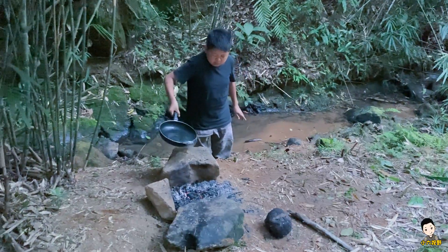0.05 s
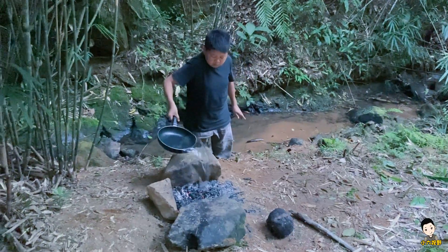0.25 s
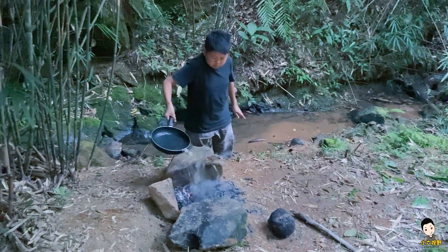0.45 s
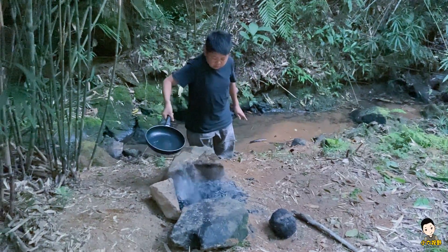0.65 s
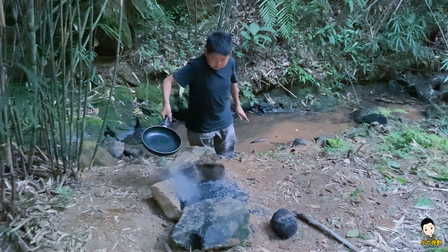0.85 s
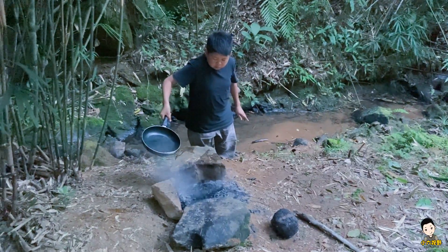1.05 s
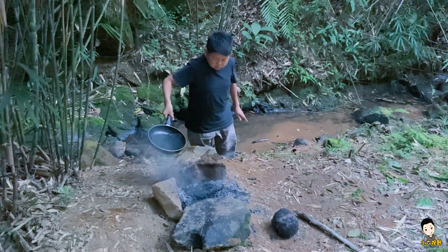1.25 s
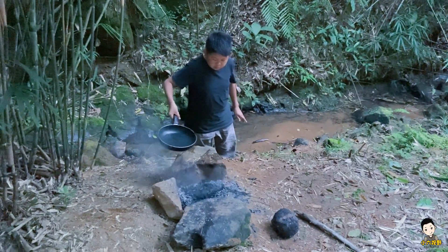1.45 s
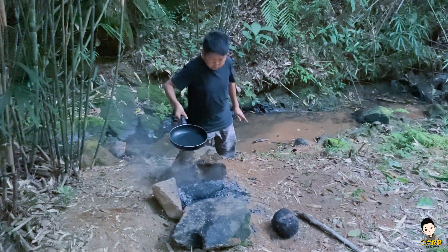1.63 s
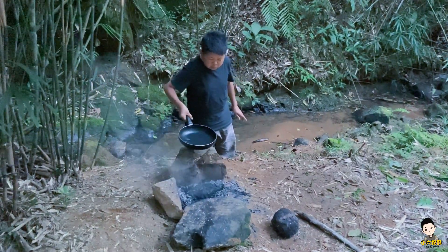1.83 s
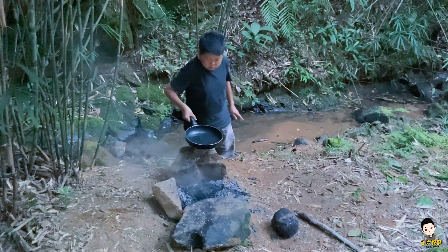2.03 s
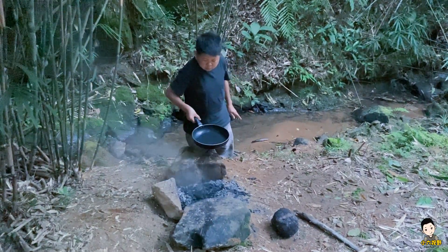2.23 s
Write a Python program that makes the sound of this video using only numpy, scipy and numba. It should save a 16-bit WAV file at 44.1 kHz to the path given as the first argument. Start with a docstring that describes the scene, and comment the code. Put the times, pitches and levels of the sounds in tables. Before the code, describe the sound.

Water hits hot charcoal with a spluttering steam hiss that fades, while cicadas drone by a stream

```python
"""Throughout, a stream murmurs behind cicadas whose clicks ring body resonances near 3.7 kHz.
At 0.3 s water tipped from a pan hits glowing charcoal: random grains, filtered and flickering, make low steam
puffs, splutter and a wide sizzle that slowly dies; a few lumps crack as short decaying tones.
One cicada slides up in a rising call at 0.72 s and again at 1.82 s.
A phone a few metres away hears it all, and its stereo processing turns left against right."""
import sys
import numpy as np
from scipy import signal
from scipy.fft import rfft, irfft, next_fast_len
from scipy.io import wavfile
from scipy.ndimage import uniform_filter1d
from numba import njit

SR = 44100
rng = np.random.default_rng(int(sys.argv[2]) if len(sys.argv) > 2 else 0)


def undo_db(level):
    """Turn decibels back into plain size, where 20 dB means ten times bigger."""
    steps = np.asarray(level, float) / 20
    return 10 ** steps


def transcribe(signal):
    """Save signal, clipped to [-1, 1], as a 16-bit WAV file at the path in sys.argv[1]."""
    frames = np.atleast_2d(signal).T
    limited = np.clip(frames, -1, 1)
    pcm = np.round(limited * 32767).astype(np.int16)
    wavfile.write(sys.argv[1], SR, pcm)


N = 100856
T = np.arange(N) / SR  # s
FFT_SIZE = next_fast_len(N, True)
HZ = np.fft.rfftfreq(FFT_SIZE, 1 / SR)


def column(table, at, order, warp=np.asarray):
    """One column of a table, joined by straight lines."""
    table = np.array(table, float)
    return np.interp(warp(at), warp(table[:, 0]), table[:, order])


def unit(x):
    """Scale to rms 1."""
    return x / np.sqrt(np.mean(x ** 2))


def walk(rate):
    """Random levels held 1 / rate s and smoothed twice; spread near 1."""
    hold = int(SR / rate)
    held = np.repeat(rng.standard_normal(N // hold + 1), hold)
    smooth = uniform_filter1d(uniform_filter1d(held, hold), hold)
    return 1.2 * smooth[:N]


def grains(rate, scatter_db):
    """Clicks at random moments, rate per second, with a long-tailed spread of sizes; rms 1."""
    hit = rng.random(N) < rate / SR
    signed_height = rng.standard_normal(N)
    size = rng.exponential(size=N)
    return unit(hit * signed_height * undo_db(scatter_db * size))


def colour(x, shape):
    """Filter by (Hz, dB) points joined on a log-frequency axis; rms 1."""
    gain = undo_db(column(shape, HZ + 1, order=1, warp=np.log))
    return unit(irfft(rfft(x, FFT_SIZE) * gain, FFT_SIZE)[:N])


def flicker(x, shared_db, own_db, rate):
    """Half-octave bands swell together and flutter alone, twice as fast; rms 1."""
    spectrum = rfft(x, FFT_SIZE)
    shared = walk(rate)
    out = 0
    for k in range(22):
        # overlapping triangular bands, from 16 Hz up
        share = np.clip(1 - abs(2 * np.log2((HZ + 1) / 16) - k), 0, 1)
        band = irfft(spectrum * share, FFT_SIZE)[:N]
        out = out + band * undo_db(shared_db * shared + own_db * walk(2 * rate))
    return unit(out)


@njit
def svf(x, hz, width, sr):
    """State-variable band-pass with a moving centre."""
    y, band, low = np.empty(len(x)), 0., 0.
    for i in range(len(x)):
        g, damping = np.tan(np.pi * hz[i] / sr), width / hz[i]
        v = (band + g * (x[i] - low)) / (1 + g * (g + damping))
        band, low, y[i] = 2 * v - band, low + 2 * g * v, damping * v
    return y


def ring(x, hz, width_hz):
    """A steep resonance: the band-pass twice, each pass width_hz wide; rms 1."""
    once = svf(x, hz, 1. * width_hz, 1. * SR)
    return unit(svf(once, hz, 1. * width_hz, 1. * SR))


def stereo_processing(direct, scattered, likeness=1.):
    """The recorder turns the phase between left and right, by frequency; the scattered part adds in opposition."""
    # recorder's stereo process: f/Hz, phase by which the right leads/rad, likeness (0-1), left over right level/dB
    stereo_table = [(170, -.1, .96, 1), (520, -.3, .94, 1.5), (690, -.5, .65, 4), (1050, -.5, .92, 3),
                    (1600, -1.3, .7, 3), (2050, -.6, .35, 1), (2700, -1.5, .65, .4), (3300, -.4, .3, -.4),
                    (3800, -.3, .55, -1), (4350, -.2, .45, -.8), (4900, -2.4, .4, 1.5),
                    (5500, -4.1, .3, 1.5), (6400, -6.2, .8, .4), (7000, -6.3, .95, .1),
                    (9150, -3.14, .996, 0), (15400, 6.3, .996, 0)]
    lead, alike, tilt_db = (column(stereo_table, HZ, order=k) for k in (1, 2, 3))
    # the likeness argument acts on the part below 8400 Hz only
    alike = np.clip(alike * np.where(HZ < 8400, likeness, 1), 0, 1)
    common = rfft(direct, FFT_SIZE) * np.sqrt((1 + alike) / 2)
    opposed = rfft(scattered, FFT_SIZE) * np.sqrt((1 - alike) / 2)
    channels = []
    for side in (1, -1):  # left, right
        turn = np.exp(-.5j * side * lead) * undo_db(side * tilt_db / 2)
        channels.append(irfft((common + side * opposed) * turn, FFT_SIZE)[:N])
    return np.array(channels)


def stream():
    """Distant running water: filtered noise, nearly smooth."""
    # tone of the water: f/Hz, relative level/dB
    water_tone = [(25, -27), (55, 3), (170, -7), (350, 2.5), (520, -1.5), (640, -11.5), (1200, -9),
                  (1700, -7), (2500, -4), (5500, 0), (7000, -3.5), (9900, -5.5), (11500, -6.5), (15500, 1)]
    water = colour(rng.standard_normal(N), water_tone)
    return undo_db(-54.5) * flicker(water, shared_db=0.37, own_db=1.9, rate=5.076)


def cicadas():
    """Dense tymbal clicks ring the insects' resonances; the chorus throbs and the caller slides up."""
    # chorus: t/s, level/dB, centre f/Hz
    chorus = [(0, -40, 3690), (.3, -42.5, 3726), (.38, -47, 3720), (.6, -46, 3657), (.8, -47, 3633),
              (.95, -41.5, 3730), (1.12, -44, 3720), (1.2, -42.5, 3770), (1.38, -44.5, 3740),
              (1.48, -42, 3766), (1.6, -46.5, 3790), (1.75, -50, 3745), (1.95, -50.5, 3680),
              (2.14, -46, 3644), (2.29, -42, 3698)]
    # tymbal and belly resonances: offset from centre f/Hz, width of each filter pass/Hz, relative level/dB
    resonances = [(-190, 196, 0), (-47, 120, -3), (107.5, 71, -0.5), (187, 260, -3), (-120, 490, -2),
                  (432, 360, -4.5), (785, 260, -9), (-480, 350, -12.5), (-1750, 79, -28.5)]
    # rising calls: start t/s, swell t/s, fade t/s, level/dB
    rising_calls = [(.72, 0.068, 0.31, -49.5), (1.82, 0.29, 0.28, -45)]
    clicks_per_s, click_scatter_db = 4000, 1.04
    throb_db, throb_per_s = 0.73, 10.95
    call_start_hz, call_rise_hz_per_s, call_width_hz = 3115, 1100, 355

    centre_hz = column(chorus, T, order=2)
    song = 0
    for offset_hz, width_hz, db in resonances:
        throb = undo_db(db + throb_db * walk(throb_per_s))
        song = song + throb * ring(grains(clicks_per_s, click_scatter_db), centre_hz + offset_hz, width_hz)
    song = unit(song) * undo_db(column(chorus, T, order=1))

    for start, swell, fade, db in rising_calls:
        age = np.clip(T - start, 0, 1)
        envelope = np.clip(np.minimum(age / swell, 1 - (age - swell) / fade), 0, 1)
        call_hz = call_start_hz + call_rise_hz_per_s * age
        buzz = ring(grains(clicks_per_s, click_scatter_db), call_hz, call_width_hz)
        song = song + undo_db(db) * envelope * buzz
    return song


def cracks():
    """Each lump rings briefly at its own pitch, a little unsteadily."""
    # cracking lumps: start t/s, level/dB, f/Hz, time to decay by 60 dB/s
    lumps = [(.351, -43, 1211, 0.15), (.351, -47, 275, 0.22), (.35, -52.5, 2214, 0.26),
             (.403, -47, 368, 0.2), (.515, -47, 2260, 0.11), (.558, -39, 1780, 0.063),
             (0.576, -46.5, 291.5, 0.29), (0.617, -38, 129, 0.046), (0.643, -43.5, 990, 0.041),
             (.647, -43, 214, 0.052), (0.725, -41, 140, .08), (.779, -41.5, 1282, 0.087),
             (.787, -42, 278, 0.074), (0.859, -46, 290, 0.14), (1.785, -54.5, 808, 0.069),
             (1.803, -59.5, 501, 0.2)]
    out = 0
    for start, db, hz, t60 in lumps:
        age = np.clip(T - start, 0, None)
        tone = np.sin(2 * np.pi * hz * age + 0.55 * walk(120))  # phase wanders, in radians
        onset = np.clip(age / 0.0028, 0, 1)
        out = out + undo_db(db - 60 * age / t60) * onset * tone
    return out


def steam():
    """Boiling droplets sizzle, water splutters among the lumps, bigger pockets of steam puff in the bass."""
    # course of the steam: t/s, sizzle level before its fixed lift/dB, puff level/dB, splutter level/dB
    course = [(.3, -63, -77, -72), (.344, -59, -60, -66), (.356, -58.5, -54.5, -55), (.42, -53, -51.5, -56),
              (.47, -56.5, -55.5, -54.5), (.57, -53, -52, -52.5), (.65, -53, -49.5, -52.5),
              (.72, -53.5, -49, -54.5), (.79, -54.5, -49.5, -51.5), (.84, -56, -55, -54),
              (.96, -57.5, -59.5, -57.5), (1.08, -58, -62.5, -60.5), (1.24, -59.5, -70.5, -59.5),
              (1.42, -61.5, -60.5, -62), (1.58, -65, -68, -64), (2.02, -68.5, -78.5, -68.5),
              (2.1, -67.5, -69.5, -69.5), (2.287, -68, -72, -71)]
    # tone of the sizzle: f/Hz, relative level/dB
    sizzle_tone = [(2000, -15), (3000, 3.5), (5000, 0.5), (6200, -1.5), (7400, -2.5), (9000, -3),
                   (12000, -2), (15500, -6.5)]
    # tone of the puffs: f/Hz, relative level/dB
    puff_tone = [(25, -38), (55, -3.5), (140, -1), (210, -4), (290, 0), (400, -2), (510, -6.5),
                 (590, -28.5), (800, -36)]
    # tone of the splutter: f/Hz, relative level/dB
    splutter_tone = [(480, -40), (640, -6), (860, -0.5), (1200, 4.5), (1600, -1.5), (2200, 3), (2800, 2),
                     (3600, -24.5)]
    pour_s, pour_rise_s, sizzle_lift_db = 0.297, .03, 8.5

    droplets = colour(grains(14000, scatter_db=0.93), sizzle_tone)
    sizzle = flicker(droplets, shared_db=-1.1, own_db=1.0, rate=8)
    pockets = colour(grains(1500, scatter_db=1.4), puff_tone)
    puffs = flicker(pockets, shared_db=0.94, own_db=2.4, rate=12)
    spits = colour(grains(3000, scatter_db=1.17), splutter_tone)
    splutter = flicker(spits, shared_db=1.37, own_db=1.8, rate=8.79)

    sizzle_db, puff_db, splutter_db = (column(course, T, order=k) for k in (1, 2, 3))
    poured = np.clip((T - pour_s) / pour_rise_s, 0, 1)
    mix = sizzle * undo_db(sizzle_lift_db + sizzle_db) + puffs * undo_db(puff_db) + splutter * undo_db(splutter_db)
    return poured * mix


def scene():
    """All sources after the recorder's stereo processing; the cracks have no scattered part."""
    background = stereo_processing(stream(), stream(), likeness=0.43)
    insects = stereo_processing(cicadas(), cicadas())
    fire = stereo_processing(steam() + cracks(), steam())
    return background + insects + fire


def band_limit(x):
    """A steep low-pass at the top of the band."""
    return signal.sosfilt(signal.butter(12, 16670, fs=SR, output="sos"), x)


def record(dry):
    """The phone cuts the top steeply above 15450 Hz."""
    top_cut = signal.ellip(14, .2, 90, 15450, fs=SR, output="sos")
    finished = signal.sosfilt(top_cut, dry)
    return band_limit(finished)


dry = scene()
out = record(dry)
transcribe(out)
```